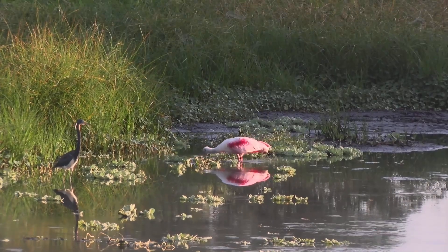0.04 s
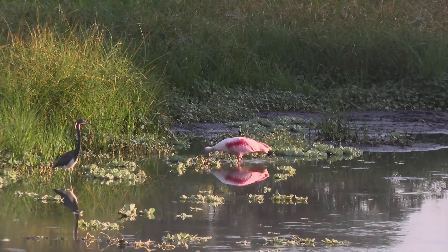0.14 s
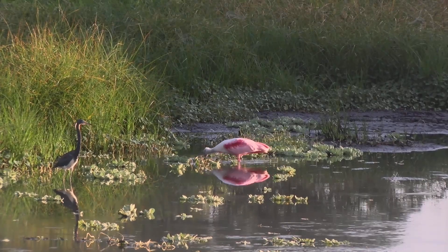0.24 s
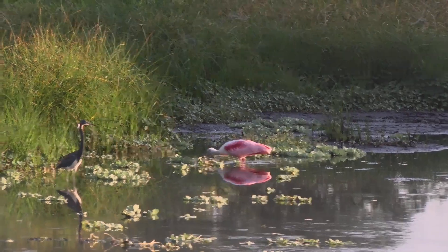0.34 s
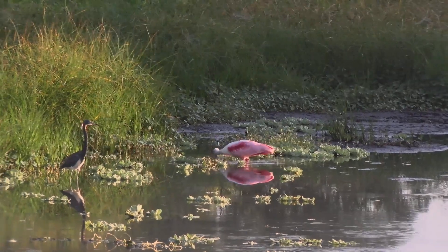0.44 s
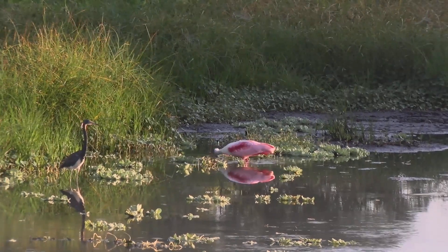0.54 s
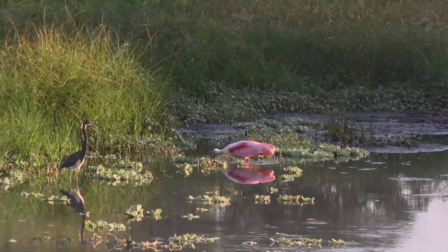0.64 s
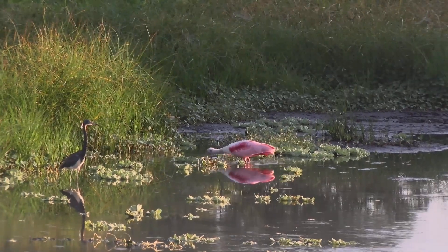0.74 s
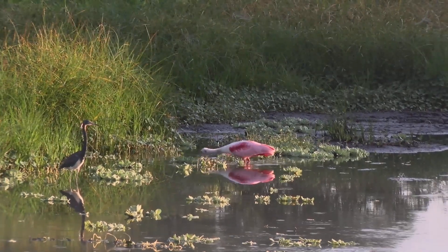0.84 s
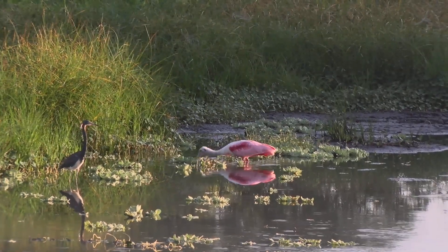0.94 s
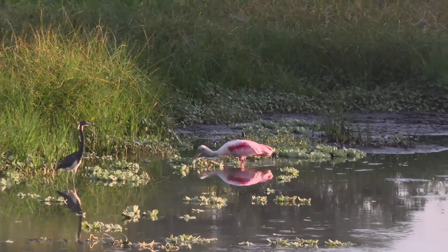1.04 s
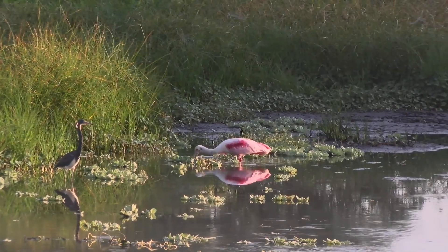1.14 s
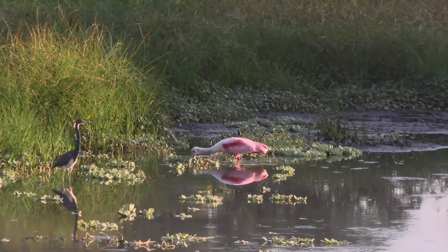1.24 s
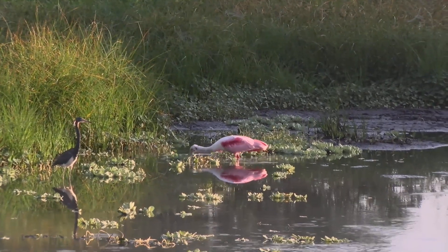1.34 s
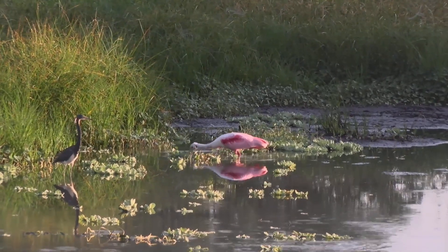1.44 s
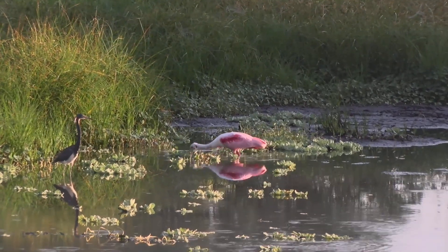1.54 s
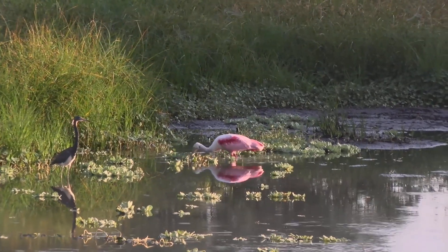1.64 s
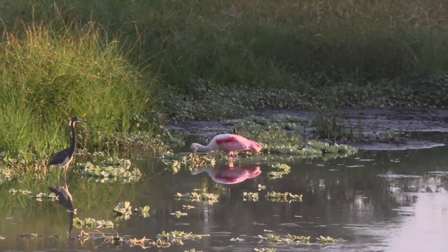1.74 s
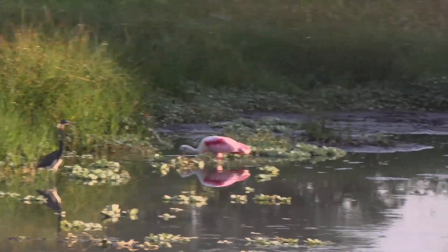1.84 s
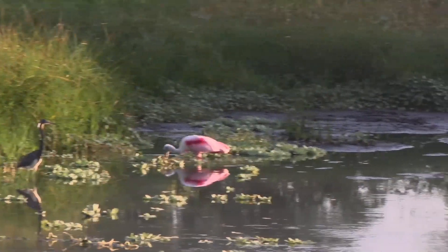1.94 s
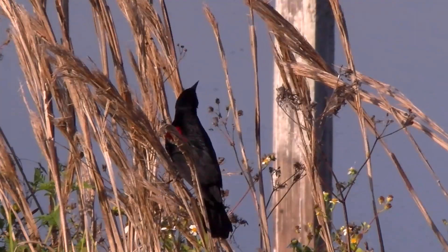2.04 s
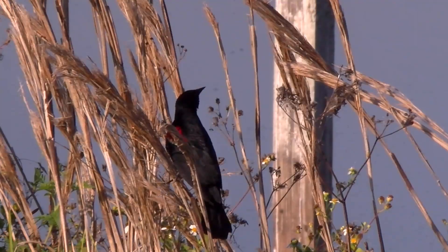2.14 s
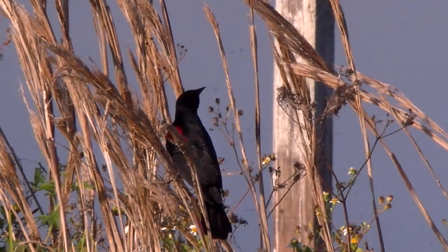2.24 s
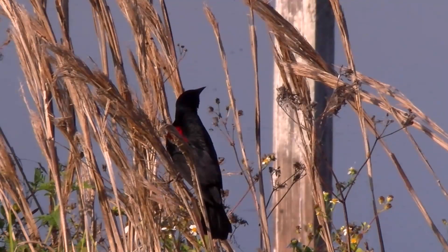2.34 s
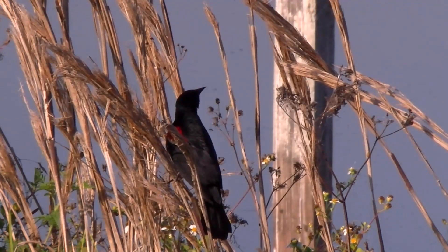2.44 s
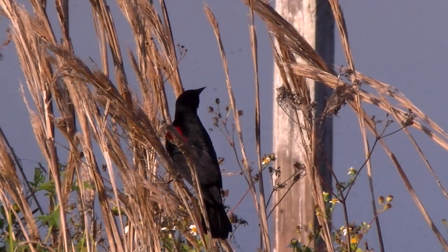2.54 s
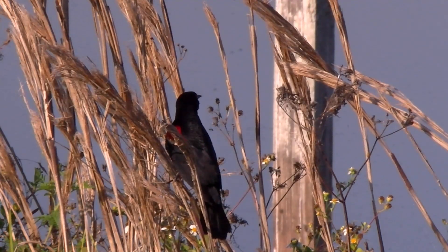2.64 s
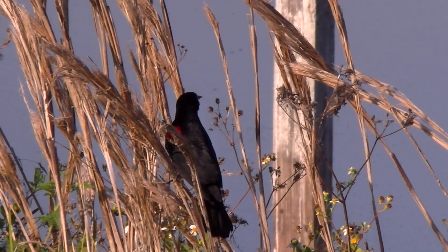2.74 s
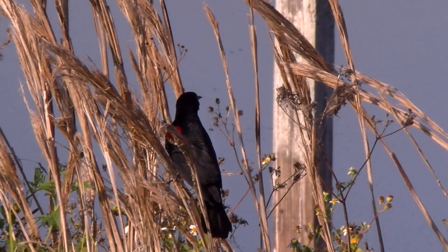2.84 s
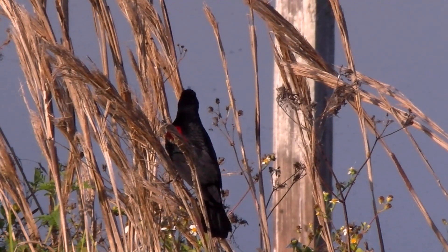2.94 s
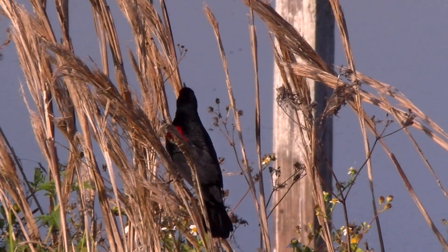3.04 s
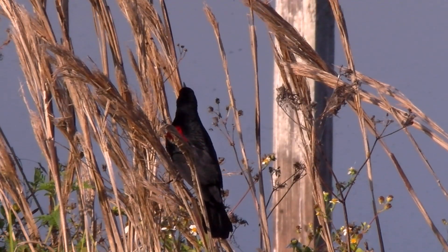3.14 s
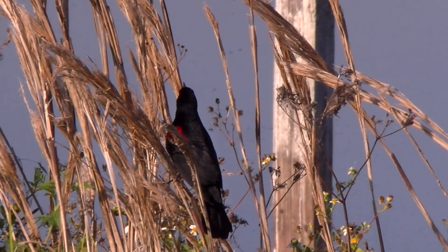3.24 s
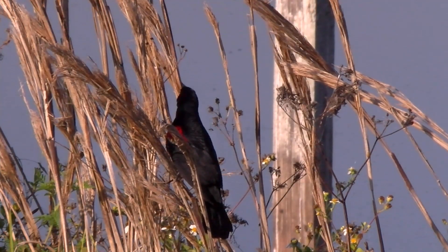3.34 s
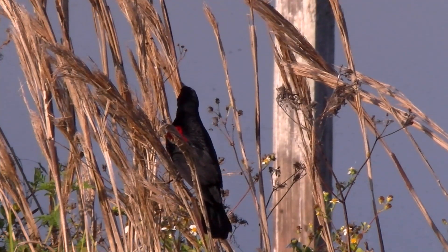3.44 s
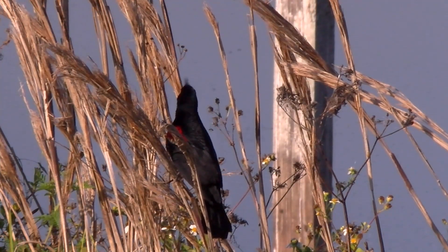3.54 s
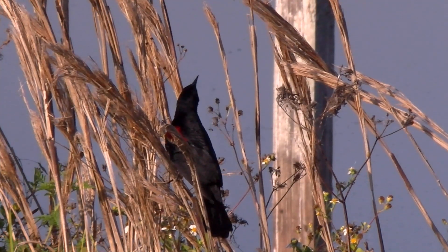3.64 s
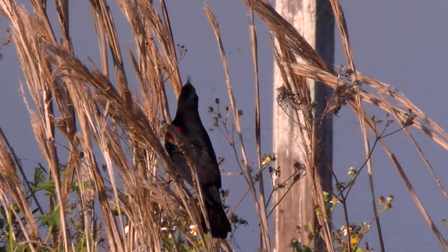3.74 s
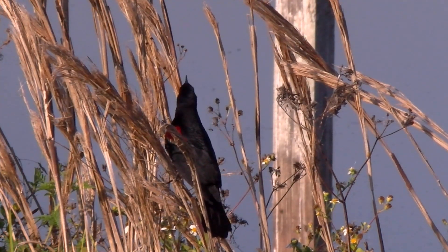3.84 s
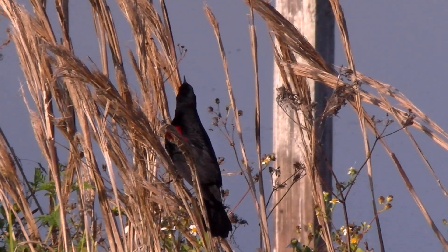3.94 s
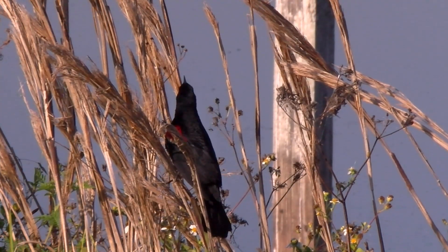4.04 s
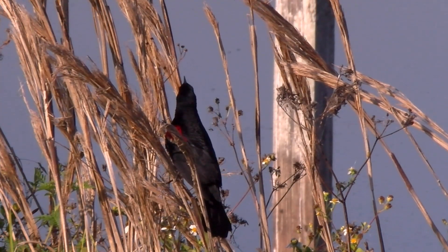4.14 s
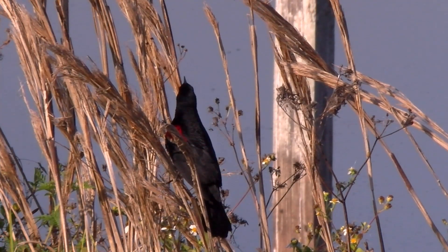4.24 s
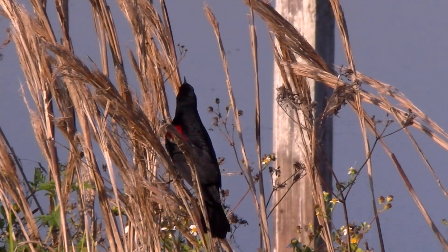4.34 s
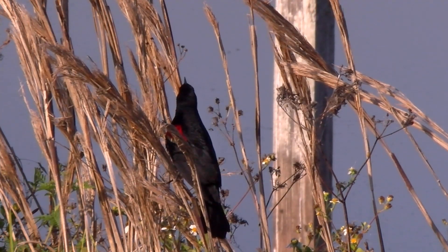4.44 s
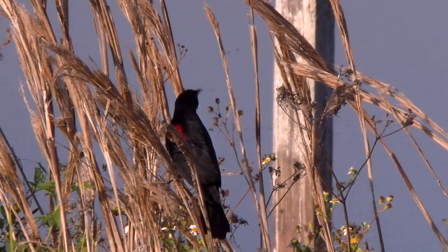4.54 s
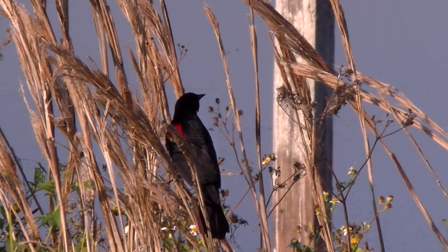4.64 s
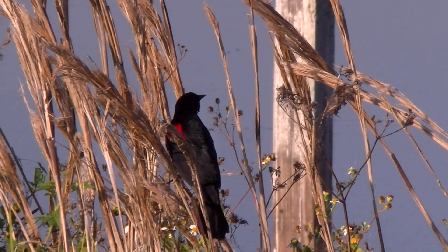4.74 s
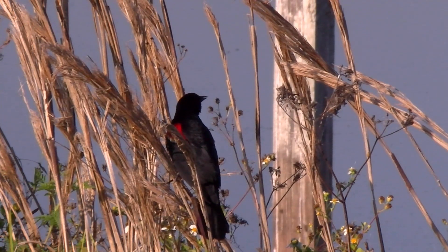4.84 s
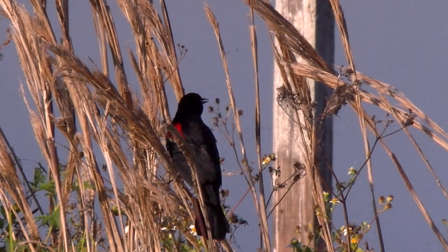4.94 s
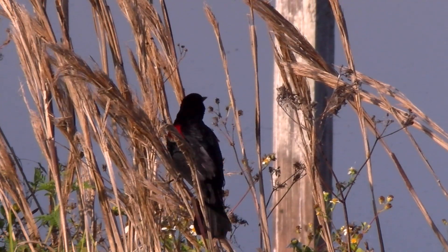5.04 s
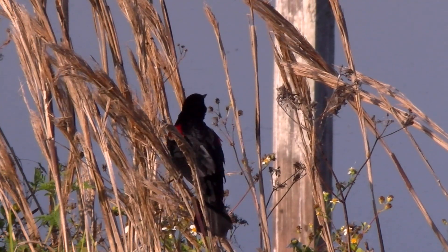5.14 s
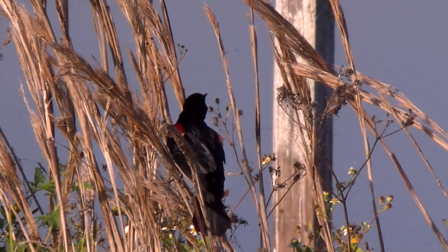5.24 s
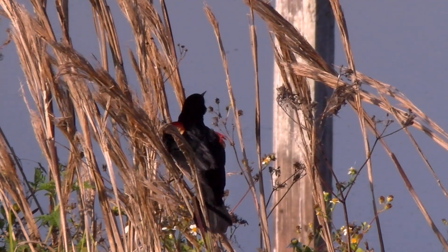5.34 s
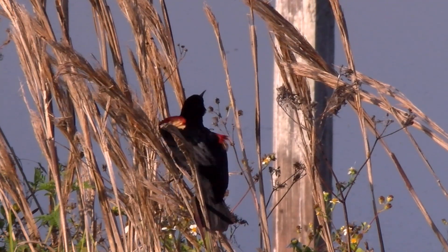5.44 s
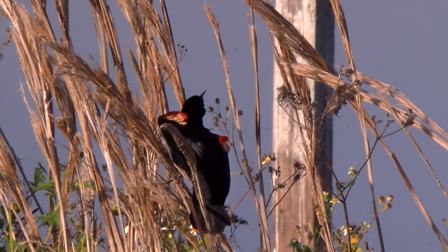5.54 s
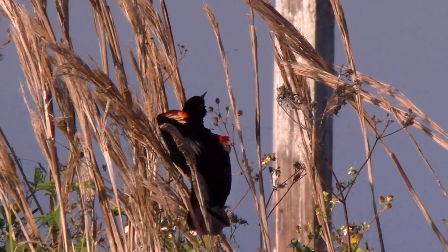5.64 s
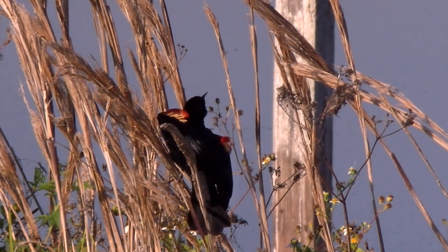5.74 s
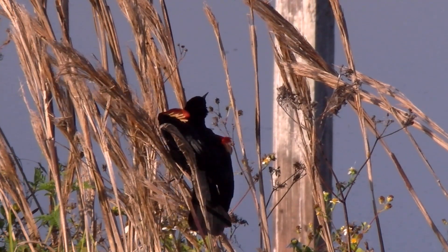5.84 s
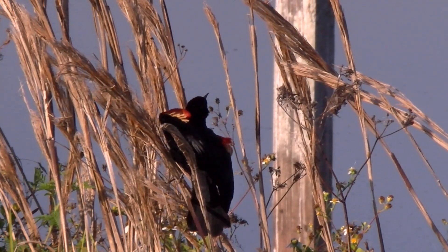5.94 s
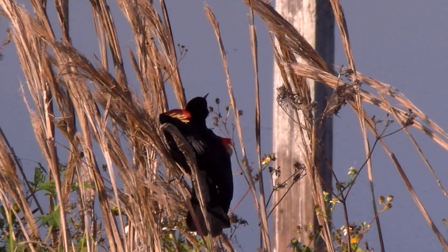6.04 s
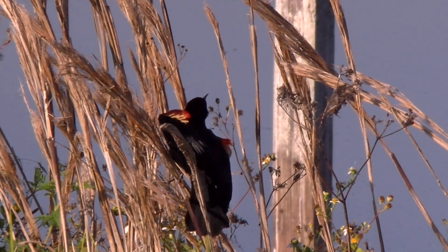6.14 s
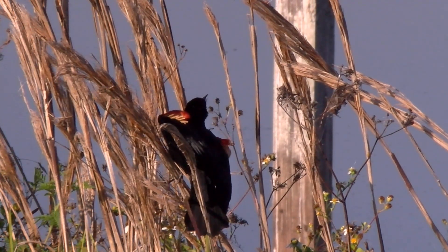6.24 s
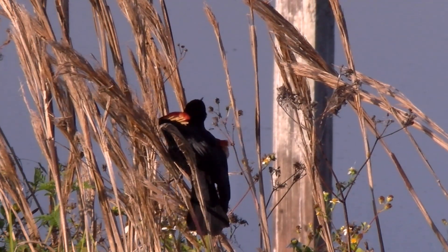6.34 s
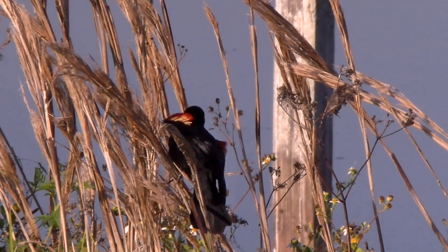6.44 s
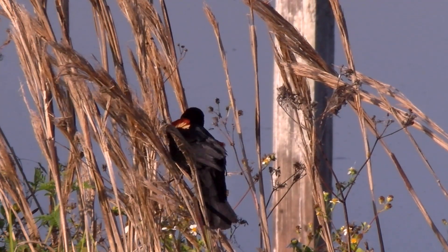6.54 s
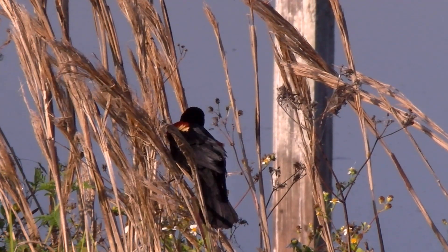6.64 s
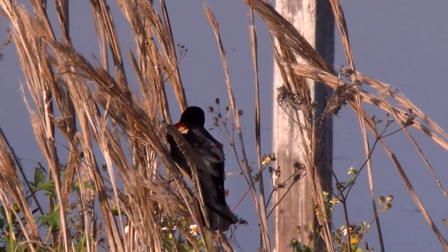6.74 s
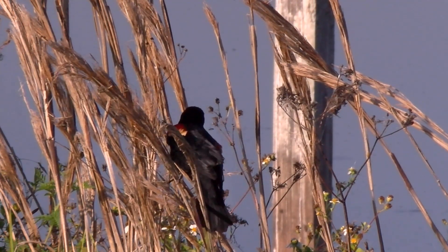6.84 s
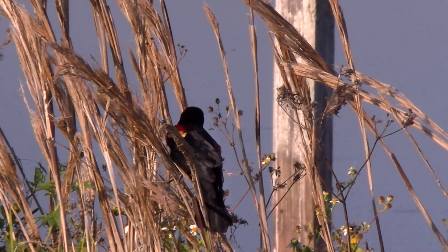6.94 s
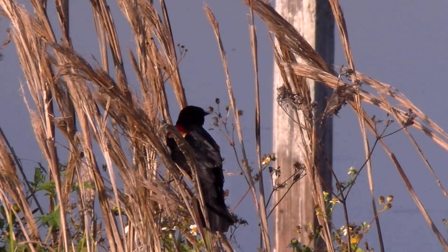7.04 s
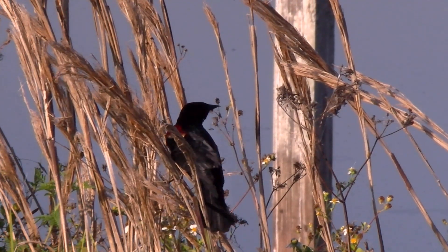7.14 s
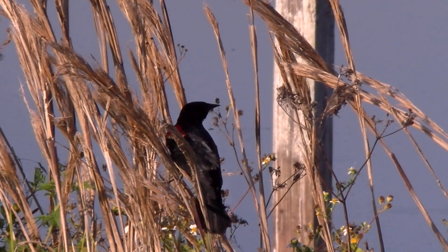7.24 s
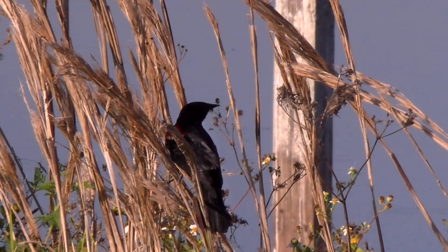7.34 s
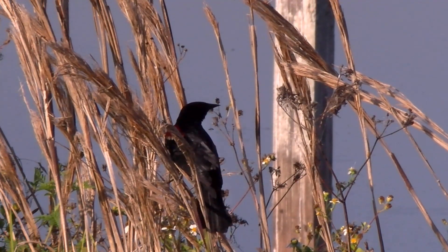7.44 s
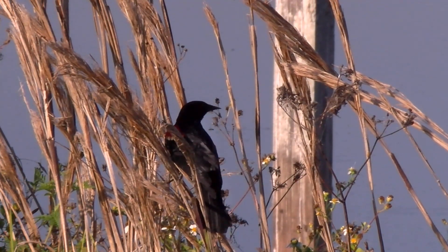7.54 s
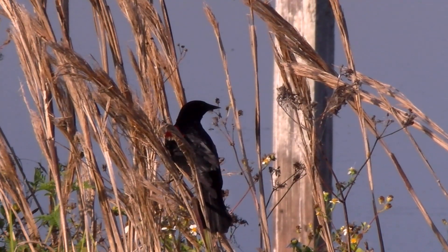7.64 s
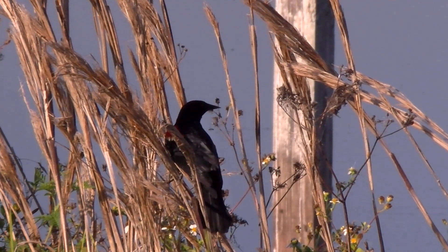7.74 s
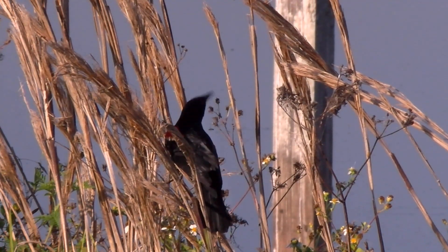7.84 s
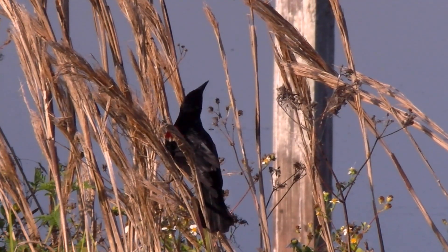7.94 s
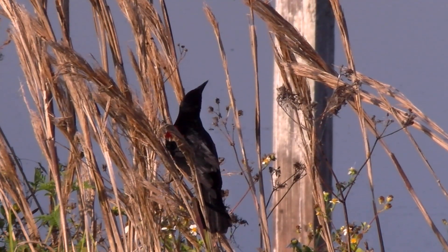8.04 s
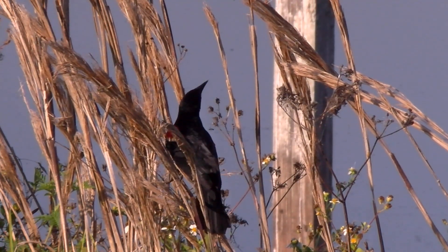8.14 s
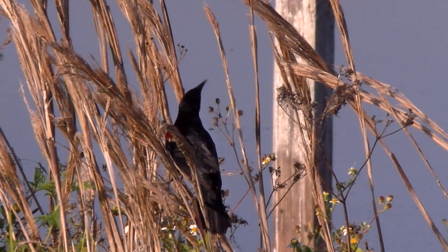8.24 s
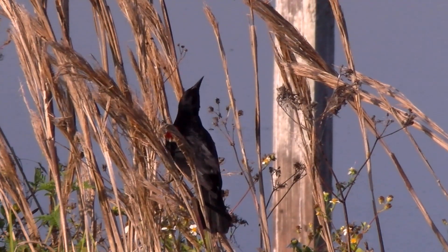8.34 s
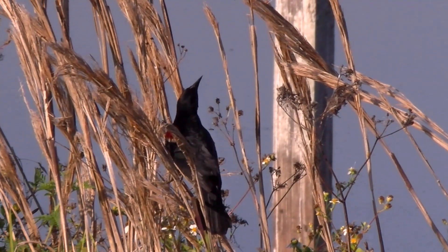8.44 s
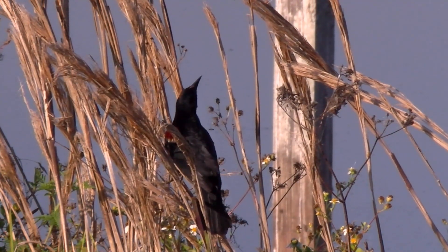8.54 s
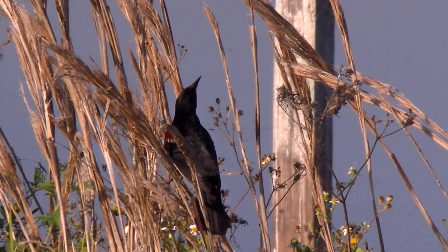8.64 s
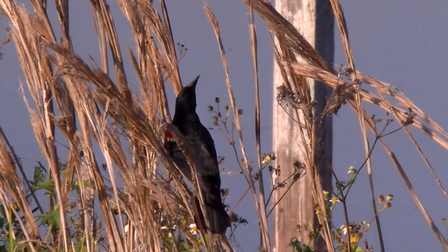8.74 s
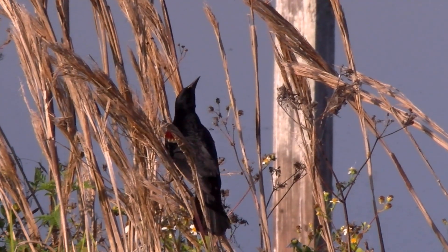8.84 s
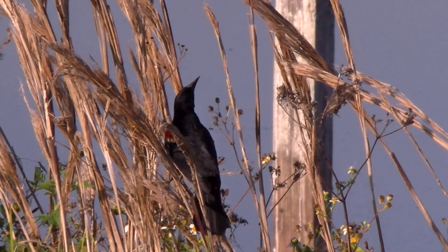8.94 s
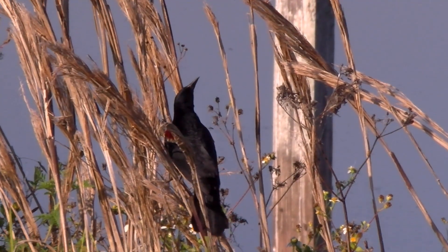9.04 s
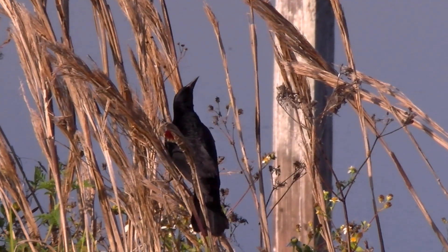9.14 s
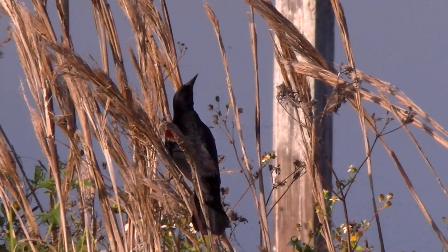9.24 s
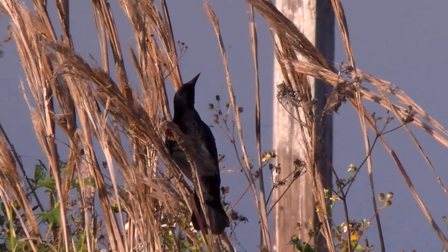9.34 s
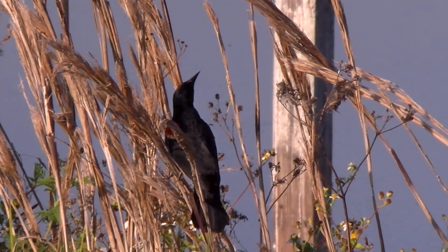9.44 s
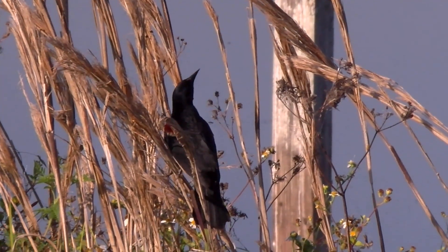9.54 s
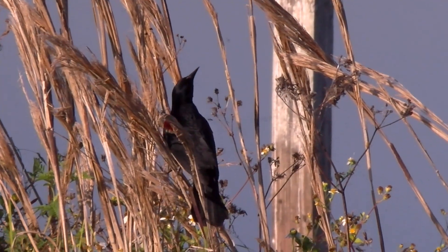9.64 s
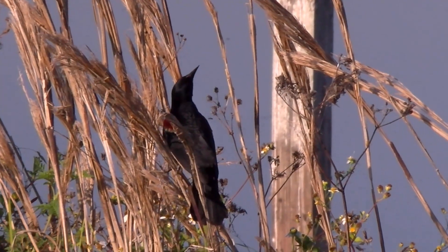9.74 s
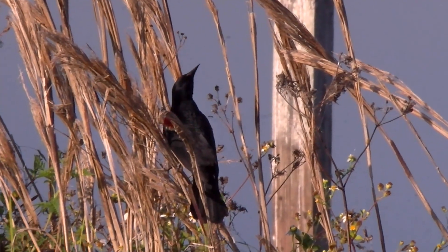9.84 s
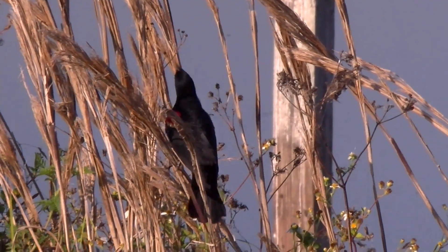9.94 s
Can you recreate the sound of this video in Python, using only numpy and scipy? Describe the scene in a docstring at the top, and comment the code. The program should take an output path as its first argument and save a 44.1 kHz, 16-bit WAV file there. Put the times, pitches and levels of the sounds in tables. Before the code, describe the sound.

Two marsh places, heard through an open-air microphone. First comes a rumbling pond with pulsing crickets, three raspy bird calls and bassy wind bumps. Then the background drops abruptly to a steady low hum and thin insect sizzle, with small distant chirps. Nearby, a red-winged blackbird gives a loud gurgling whistle and metallic trill, pauses, and repeats it more quietly, with light echo from the reeds.

```python
"""Marsh in two places

First a wide pond: low roar, wind bumps on the microphone, a cricket chorus, a rasping bird. Then a reed bed:
a motor hum, a katydid's high buzz, far chirps, and a blackbird close by that sings twice, each time liquid
whistles, a buzzing trill and a warbled ending. Air and wind are shaped noise, insects are noise ringing in
wing resonances, and birds are gliding tones, gated into syllables for trills, with echoes from the marsh."""
import sys
import numpy as np
from scipy import signal
from scipy.fft import rfft, irfft
from scipy.io import wavfile
from scipy.ndimage import uniform_filter1d

SR = 44100
rng = np.random.default_rng(int(sys.argv[2]) if len(sys.argv) > 2 else 0)


def dump(signal):
    """Clip the signal to [-1, 1] and save it as 16-bit WAV at the path in sys.argv[1]."""
    limited = np.clip(np.atleast_2d(signal).T, -1, 1)
    pcm = np.round(limited * 32767).astype(np.int16)
    wavfile.write(sys.argv[1], SR, pcm)


N = 440118
T = np.arange(N) / SR   # seconds
PLACE_CHANGE_S = 1.963   # from the pond to the reed bed

# Steady air at each place. Each row: frequency in Hz, power in dB per Hz.
POND_SPECTRUM = [(30, -120), (80, -67), (170, -75.5), (200, -61), (270, -60), (500, -69), (900, -78),
                 (1100, -82.5), (2000, -99), (5800, -99), (6800, -106), (7700, -101), (9000, -108),
                 (16000, -110)]
REED_SPECTRUM = [(25, -101), (60, -89), (130, -79), (200, -74), (340, -83), (700, -83.5), (1100, -95.5),
                 (1600, -102), (3000, -104), (4500, -107), (7000, -108), (16000, -110)]
# Gusts on the microphone. Each row: loudest moment in seconds, rumble level in dB.
WIND_GUSTS = [(.35, -57), (.48, -45), (.95, -51), (1.5, -47), (1.76, -52), (1.95, -56), (8.95, -50),
              (9.1, -52)]
# Wind bumps on the microphone. Each row: middle in seconds, level in dB, pitch in Hz,
# time from middle to near silence in ms, roughness (0 is smooth).
WIND_BUMPS = [(.31, -39, 64.3, 25, .2), (1.431, -19, 76.6, 23, 0.2), (1.676, -17, 76, 9.8, 0.07),
              (1.72, -30, 65, 18, .2)]
# Wing resonances of the pond's cricket chorus. Each row: centre in Hz, width of one pass in Hz, level in dB.
CHORUS_WINGS = [(4245, 500, -53), (4560, 320, -53), (4910, 660, -53)]
# Wing resonance of a single cricket at the pond. Each row: centre in Hz, width of one pass in Hz, level in dB.
CRICKET_WINGS = [(5182, 88, -49.5)]
# When that cricket chirps. Each row: start in seconds, end in seconds.
CRICKET_CHIRP_TIMES = [(0, 0.17), (.29, 0.43), (.58, 0.68), (.8, 0.94), (1.12, 1.326), (1.48, 1.6),
                       (1.7, 1.88)]
# Wing resonances of the katydid in the reeds. Each row: centre in Hz, width of one pass in Hz, level in dB.
KATYDID_WINGS = [(8786, 580, -55.5), (9106, 340, -51.5), (9580, 210, -61), (9993, 67, -62)]
# Wing resonance of a far cricket. Each row: centre in Hz, width of one pass in Hz, level at full chirp in dB.
FAR_CRICKET_WINGS = [(5590, 590, -69.5)]
# Chirps of far birds, each one glide. Each row: start in seconds, length in ms, from Hz, to Hz, level in dB.
FAR_BIRD_CHIRPS = [ (1.89, 72, 2700, 2180, -51), (2.135, 68, 1640, 1646, -66), (1.885, 50, 3500, 2900, -60),
                   (2.18, 230, 3440, 3010, -70), (2.25, 16, 3100, 2100, -58.5), (2.27, 9, 3000, 4300, -59),
                   (2.34, 10, 3350, 2600, -64), (2.275, 81, 4280, 3170, -61), (2.522, 62, 2790, 2230, -53),
                   (2.612, 78, 4100, 3180, -66), (3.03, 82, 5400, 4800, -70), (3.14, 50, 3160, 2150, -64),
                   (3.2, 93, 2125, 2170, -74), (3.272, 100, 4740, 4430, -66), (3.9, 56, 2900, 2100, -69),
                   (4.22, 68, 3520, 3460, -72), (4.31, 80, 3430, 3130, -72), (4.885, 120, 4840, 4770, -69),
                   (6.7, 16, 3610, 1880, -61), (6.738, 91, 2080, 2165, -56), (7.03, 34, 3400, 3890, -65.5),
                   (7.085, 29, 4400, 3280, -61.5), (7.175, 63, 4450, 4150, -64.5),
                   (7.215, 55, 4100, 2900, -66), (7.82, 30, 4250, 4350, -71),
                   (7.975, 30, 4250, 4050, -68.5), (7.95, 45, 3200, 3480, -70),
                   (7.893, 44, 4150, 4280, -70.5), (7.995, 225, 3450, 3030, -69.5),
                   (8.062, 27, 4450, 4130, -67), (8.206, 63, 4020, 4230, -68),
                   (8.315, 58, 4330, 3850, -66.5), (9.44, 30, 4620, 3880, -65.5),
                   (9.528, 51, 4060, 3720, -61.5), (9.58, 47, 3880, 3760, -53.5),
                   (9.69, 60, 4480, 4150, -63)]
# Short ticks and chucks, the blackbird's own among them. Each row: middle in seconds, level in dB, pitch in Hz,
# time from middle to near silence in ms, roughness (0 is smooth).
SHORT_TICKS = [(.662, -41, 2310, 5, 0.4), (.686, -45, 2300, 5, 0.3), (.762, -40.5, 2100, 4, 0.68),
               (.851, -21.5, 2570, 13, 0.84), (.962, -41, 2100, 4, 0.9), (1.417, -33, 1110, 6, 0.46),
               (2.115, -47, 4500, 1.2, 0.6), (2.495, -46.5, 2440, 9, 0.5), (2.5185, -20.5, 2330, 1.1, 0.23),
               (2.775, -56, 2500, 11, 0.76), (2.81, -52, 2200, 4, 1.1), (3.875, -53, 2700, 3, .3),
               (5.505, -28.5, 3450, 15, 1.1), (6.258, -40.5, 1930, 8.5, 0.75), (5.213, -37, 1300, 3, 0.6),
               (5.2955, -31, 1420, 2.5, 0.4), (5.3275, -17, 2080, 1.5, 0.42), (5.5125, -21, 5740, 2.5, .2),
               (5.516, -7, 3980, 1.6, 0.2), (7.098, -51.5, 1300, 5, 0.25), (8.123, -39, 1910, 8, 0.94),
               (8.113, -36, 1364, 4, 0.54), (8.441, -40, 5700, 3, 0.2), (8.44, -34, 4300, 2.5, 0.54),
               (9.765, -46, 3260, 3, 0.5), (9.79, -51, 3300, 5, 0.43)]
# The rasping bird's three calls. Each row: loudest moment in seconds, level in dB.
RASP_CALLS = [(.06, -44), (0.44, -46.5), (0.848, -39.5)]

# Trills repeat one syllable, and share three kinds of table.
# Pace. Each row: time in seconds, syllables begun.
# Effort. Each row: time in seconds, level in dB.
# Voices. Each row: start and length as shares of a syllable, from Hz, to Hz, dB against the other voices,
# roughness (0 to 1).
# The rasping bird: syllable pace, voices.
RASP_SYLLABLES = [(0, 0), (.95, 82)]
RASP_TONES = [(0, .95, 3480, 3320, 0, .45), (.3, .9, 3200, 3000, -6, .7), (.2, .9, 2600, 2350, -15, .8)]
# A bird's short rattle: pace, effort, voices.
RATTLE_SYLLABLES = [(7.39, 0), (7.535, 11)]
RATTLE_LEVEL = [(7.39, -66), (7.41, -66), (7.5, -66), (7.535, -72)]
RATTLE_TONES = [(0, .7, 4600, 3400, 0, .5), (.3, .7, 4000, 3100, -3, .8)]
# Blackbird, first phrase, quick buzz: pace, effort, voices.
BUZZ_SYLLABLES = [(5.3785, 0), (5.4335, 10), (5.4635, 16), (5.479, 19.5)]
BUZZ_LEVEL = [(5.372, -48), (5.392, -25), (5.414, -20.5), (5.432, -19.5), (5.455, -21), (5.479, -30)]
BUZZ_TONES = [(0, .75, 3300, 4450, 0, .08), (.5, .55, 4400, 4300, -7, .15), (0, 1, 5640, 5600, -18, .1),
              (0, 1, 6380, 6440, -26, .15), (.1, .8, 7000, 7700, -36, .2), (0, .9, 13000, 13200, -44, .5)]
# Blackbird, first phrase, long trill: pace, effort, voices.
LONG_TRILL_SYLLABLES = [(5.5518, 0), (5.7012, 9), (5.8582, 18), (6.0003, 26), (6.1437, 34), (6.2683, 41)]
LONG_TRILL_LEVEL = [(5.546, -23.5), (5.556, -17), (5.601, -20.5), (5.9, -20.5), (6.24, -22), (6.259, -26),
                    (6.271, -41.5)]
LONG_TRILL_TONES = [(-.08, .62, 3115, 3075, 1, .2), (-.08, .58, 3620, 3740, -1.5, .3),
                    (-.07, .2, 3300, 3550, -4, .15), (.27, .27, 3900, 4150, -6, .3),
                    (.45, .55, 4000, 3650, -10, .6), (.45, .55, 2950, 3250, -12.5, .6),
                    (0, .98, 2800, 2300, -23, .8), (.8, .99, 5560, 5760, -15, .6),
                    (.4, .5, 5700, 5500, -20, .7), (.8, .6, 5280, 5400, -19, .5),
                    (.9, .7, 5950, 6400, -26, .6), (0, .9, 4400, 4900, -34, .9)]
# Blackbird, first phrase, warbled ending: pace, effort, voices.
WARBLE_SYLLABLES = [(6.27, 0), (6.286, 1.0), (6.316, 3), (6.343, 5), (6.405, 10)]
WARBLE_LEVEL = [(6.264, -38), (6.279, -24), (6.295, -19.5), (6.322, -20), (6.343, -30), (6.37, -40),
                (6.405, -58)]
WARBLE_TONES = [(0, 1, 2480, 2030, 0, .1), (.75, .5, 2150, 2500, -8, .3)]
# Blackbird, second phrase, short trill: pace, effort, voices.
SHORT_TRILL_SYLLABLES = [(8.447, 0), (8.4654, 2.0), (8.4812, 4), (8.607, 20.0), (8.7823, 42)]
SHORT_TRILL_LEVEL = [(8.444, -52), (8.454, -42), (8.458, -28), (8.6, -27.5), (8.776, -27.5), (8.784, -42)]
SHORT_TRILL_TONES = [(0, .66, 3770, 3630, 0, .2), (0, .72, 3430, 3110, -2, .35),
                     (.35, .72, 3150, 2820, -5, .4), (.5, .6, 3500, 3740, -7, .4),
                     (.5, .99, 5500, 5720, -9, .4), (0, .99, 4250, 5000, -28, .9),
                     (0, .99, 2650, 2300, -27, .9)]
# Blackbird, second phrase, ending: pace, effort, voices.
ENDING_SYLLABLES = [(8.803, 0), (8.8425, 4), (8.865, 6), (8.894, 8), (8.927, 10), (9.02, 15)]
ENDING_LEVEL = [(8.798, -49), (8.825, -23.5), (8.86, -25), (8.884, -34), (8.9, -42), (8.94, -53),
                (9.02, -74)]
ENDING_TONES = [(0, 0.98, 4600, 4260, 0, .05)]
# The other side of the syrinx under that ending, at the same pace: effort, voices.
UNDER_LEVEL = [(8.803, -30), (8.83, -40), (8.86, -43), (8.885, -40), (8.915, -55)]
UNDER_TONES = [(0, 0.67, 3000, 2360, -6, 0.6), (0.33, 0.95, 2300, 2560, -3, 0.73),
               (0, 0.51, 4100, 3600, -9, 0.87)]
# The blackbird's whistled notes. Each row: start in seconds, attack in ms, hold in ms, release in ms,
# from Hz, to Hz, level in dB.
SONG_WHISTLES = [ (5.05, 24, 28, 68, 1258, 1306, -33), (5.285, 12, 28, 12, 1530, 1690, -38),
                 (5.306, 18, 8, 8, 2580, 2500, -41), (5.336, 3, 6, 26, 1990, 2200, -22),
                 (5.345, 14, 68, 55, 2183, 2181, -34), (5.355, 55, 18, 18, 4372, 4376, -33),
                 (5.443, 17, 12, 12, 4230, 4130, -27.5), (5.475, 14, 1, 14, 2260, 2250, -28),
                 (5.472, 17, 3, 14, 2605, 2665, -23), (5.518, 6, 20, 16, 3285, 3232, -9.5),
                 (6.33, 12, 28, 40, 2390, 2500, -33), (6.33, 10, 8, 60, 2130, 2230, -36),
                 (7.92, 47, 16, 90, 1595, 1560, -43), (7.915, 52, 10, 110, 812, 775, -56),
                 (8.131, 7, 1, 13, 1890, 1865, -40), (8.131, 8, 1, 17, 2250, 2480, -39),
                 (8.178, 54, 14, 92, 1622, 1640, -22.5), (8.337, 11, 10, 22, 1255, 1280, -40),
                 (8.358, 18, 2, 8, 2490, 2580, -30), (8.374, 9, 5, 9, 2315, 2170, -21),
                 (8.388, 11, 6, 34, 2615, 2655, -29), (8.392, 12, 3, 20, 2195, 2235, -35),
                 (8.78, 15, 2, 11, 2640, 2575, -22), (8.783, 7, 2, 15, 2200, 2180, -39),
                 (8.865, 40, 46, 55, 2275, 2195, -33.5)]
# Overtones of some whistles, keyed by row number. Each row: multiple of the pitch, dB against the whistle.
WHISTLE_OVERTONES = {0: [(2, -32), (3, -33)], 4: [(3, -26)], 5: [(3, -38)], 9: [(.5, -34), (1.5, -38),
                     (2, -37), (4, -55)], 16: [(2, -52), (3, -53)], 20: [(.5, -25), (1.5, -40)]}

HUM_HZ, REED_HUM_DB, POND_HUM_DB = 96.9, -48, -51
GUST_RISE_DB_PER_S, GUST_FALL_DB_PER_S, POND_LULL_DB = 173.5, 148, -78
FAR_CRICKET_PER_S, FAR_CRICKET_BEAT_S = 4.77, 2.195   # chirp rate, one chirp's middle
RASP_SWELL_DB_PER_S2 = 2200   # how sharply each call swells and fades
CHIRP_ATTACK_SHARE, CHIRP_HOLD_SHARE, CHIRP_RELEASE_SHARE = .18, .55, .27   # of a chirp's length
NOTE_EDGE_DB = 36.5   # how far a note's swell and fade reach under its level
SONG_WAVER_DB, CHIRP_WAVER_DB = .5, 3.5   # unsteadiness of level; far air makes chirps flicker
PACE_WAVER = .019   # trills hurry and drag by this share of a syllable
ECHO_DB, ECHO_T60_S, ECHO_LATE_DB, ECHO_LATE_T60_S = -15, .12, -37, .7
BANK_DB, BANK_DELAY_S, BANK_SPREAD_S, BANK_CUT_HZ = -52, .43, .015, 3300
CUTOFF_HZ = 16500   # the top is 80 dB down from here


def amp(db):
    """Decibels to gain."""
    return 10 ** (np.asarray(db) / 20)


def rms_one(x):
    """Scales to rms 1."""
    return x / np.sqrt(np.mean(x ** 2) + 1e-20)


def wander(hz, size=N):
    """Smooth noise that changes about hz times a second; rms 1."""
    pole = np.exp(-2 * np.pi * hz / SR)
    noise = rng.standard_normal(size + SR // 4)
    slow = signal.lfilter([1], [1, -2 * pole, pole * pole], noise)
    return rms_one(slow[SR // 4:])   # the filter has settled by here


def flutter(hz, size):
    """Noise with little above hz; rms 1."""
    low = signal.butter(6, hz, fs=SR, output="sos")
    return rms_one(signal.sosfilt(low, rng.standard_normal(size + 4000))[4000:])


def coloured(spectrum):
    """Steady noise with the given power per hertz."""
    hz, db = np.transpose(spectrum)
    bins = np.maximum(np.arange(N // 2 + 1) * SR / N, 1)
    gain = amp(np.interp(np.log(bins), np.log(hz), db)) * np.sqrt(SR / 2)
    return irfft(rfft(rng.standard_normal(N)) * gain, N)


def bursts(rows):
    """Bell-shaped tone bursts; rough ones are chopped by fast noise."""
    out = np.zeros(N)
    u = np.arange(-4000, 4000) / SR
    for s, db, hz, ms, rough in rows:
        shake = (1 - rough) + rough * flutter(hz / 4, size=len(u))
        bell = np.exp(-(u * 1000 / ms) ** 2 * 2)
        first = int(s * SR) - 4000
        out[first:first + len(u)] += amp(db) * bell * shake * np.cos(2 * np.pi * hz * u)
    return out


def insect(modes, strokes_hz, depth):
    """Scraping noise passes twice through each wing resonance, throbbing at the stroke rate."""
    out = 0
    for hz, width_hz, db in modes:
        r = np.exp(-np.pi * width_hz / SR)
        wing = [1, 0, -1], [1, -2 * r * np.cos(2 * np.pi * hz / SR), r * r]
        once = signal.lfilter(*wing, rng.standard_normal(N))
        out = out + amp(db) * rms_one(signal.lfilter(*wing, once))
    turn = 2 * np.pi * strokes_hz * T + .8 * wander(2.5)   # strokes are a little uneven
    return out * rms_one(1 + depth * np.sin(turn) + .4 * depth * np.sin(2 * turn))


def wind():
    """Gusts rumble low on the microphone; by the pond the air is never quite still."""
    band = signal.butter(3, [42, 85], "band", fs=SR, output="sos")
    rumble = rms_one(signal.sosfilt(band, rng.standard_normal(N)))
    level = amp(POND_LULL_DB) * (T < PLACE_CHANGE_S)
    for s, db in WIND_GUSTS:
        slope = np.where(T < s, GUST_RISE_DB_PER_S, GUST_FALL_DB_PER_S)
        level = level + amp(db - slope * abs(T - s))
    return level * rumble + bursts(WIND_BUMPS)


def pond():
    """The wide pond: wavering noise for the roar, a steady hum, a cricket chorus and one cricket chirping."""
    chirping = sum((T > start) & (T < end) for start, end in CRICKET_CHIRP_TIMES)
    softened = uniform_filter1d(chirping * 1., size=1500)
    cricket = softened * insect(CRICKET_WINGS, 63.3, depth=.44)
    roar = coloured(POND_SPECTRUM) * amp(1.3 * wander(19))
    hum = amp(POND_HUM_DB) * np.sqrt(2) * np.sin(2 * np.pi * HUM_HZ * T)
    return roar + hum + cricket + insect(CHORUS_WINGS, 64, depth=.098)


def reed_bed():
    """The reed bed: steady noise, a motor hum unsteady in level and phase, a katydid and a far cricket."""
    hum_level = amp(REED_HUM_DB + .6 * wander(3.2)) * np.sqrt(2)
    hum = hum_level * np.sin(2 * np.pi * HUM_HZ * T + .3 * wander(1.5))
    beat = np.cos(2 * np.pi * FAR_CRICKET_PER_S * (T - FAR_CRICKET_BEAT_S))
    chirping = np.clip(.6 + 1.5 * beat, .45, 1)   # between chirps it never falls silent
    far_cricket = chirping * insect(FAR_CRICKET_WINGS, 73, depth=.6)
    return coloured(REED_SPECTRUM) + hum + insect(KATYDID_WINGS, 61.3, depth=.27) + far_cricket


def whistles(notes, overtones, waver_db):
    """Near-sines that glide evenly in pitch while they swell, hold and fade."""
    out = np.zeros(N)
    for number, (s, attack_ms, hold_ms, release_ms, from_hz, to_hz, db) in enumerate(notes):
        total_ms = attack_ms + hold_ms + release_ms
        ms = np.arange(int(total_ms * SR / 1000)) * 1000 / SR
        turn = 2 * np.pi * np.cumsum(np.linspace(from_hz, to_hz, len(ms))) / SR
        tone = np.sin(turn)
        for multiple, overtone_db in overtones.get(number, []):
            tone = tone + amp(overtone_db) * np.sin(multiple * turn)
        opening = np.clip(np.minimum(ms / attack_ms, (total_ms - ms) / release_ms), 0, 1)
        level_db = waver_db * wander(50, size=len(ms)) - NOTE_EDGE_DB * (1 - opening) ** 2
        level = amp(level_db) * np.minimum(10 * opening, 1)   # starts and ends at zero
        first = int(s * SR)
        out[first:first + len(ms)] += np.sqrt(2) * amp(db) * level * tone
    return out


def trill(pace, effort, voices, edge, lean, climb=0):
    """Each syllable gates a few gliding tones, each entering at its own share of the syllable with its phase
    restarted; roughness shakes them and varies every repeat. A high edge opens and shuts abruptly;
    lean under 1 peaks early, over 1 late; voices starting above 4.5 kHz climb (or sink, if negative)
    by a share of their pitch across the trill."""
    s, db = np.transpose(effort)
    span = slice(int(s[0] * SR), int(s[-1] * SR))
    beat = np.interp(T[span], *np.transpose(pace))
    beat = np.maximum.accumulate(beat + PACE_WAVER * wander(12, size=len(beat)))   # never runs backwards
    sound = 0
    for start, length, from_hz, to_hz, voice_db, rough in voices:
        which, share = np.divmod(beat - start, 1)   # syllable number, place within it
        along = np.clip(share / length, 0, 1)
        chance = rng.standard_normal((100, 2))[which.astype(int) % 100]   # one pitch and level draw a syllable
        hz = (from_hz + (to_hz - from_hz) * along) * (1 + .01 * rough * chance[:, 0])
        hz = hz * (1 + climb * (from_hz > 4500) * np.linspace(-.5, .5, len(hz)))
        turn = 2 * np.pi * np.cumsum(hz) / SR
        turn = turn - turn[np.searchsorted(which, which)]   # phase restarts with each repeat
        gate = np.sin(np.pi / 2 * np.clip(edge * np.sin(np.pi * along ** lean), 0, 1)) ** 2
        shake = (1 - rough) + rough * flutter(180, size=len(beat))
        voice_level = amp(voice_db + 2.5 * rough * chance[:, 1])
        sound = sound + gate * voice_level * shake * np.sin(turn)
    reach = np.array(voices)[:, 2:4]
    throat = signal.butter(4, [.92 * reach.min(), 1.05 * reach.max()], "band", fs=SR, output="sos")
    sound = signal.sosfilt(throat, sound)   # the throat passes little outside the sung range
    level = amp(np.interp(T[span], s, db)) * signal.windows.tukey(len(beat), .04)
    out = np.zeros(N)
    out[span] = rms_one(sound) * level
    return out


def far_chirps():
    """Far birds chirp in short single glides that flicker in level."""
    shares = np.array([CHIRP_ATTACK_SHARE, CHIRP_HOLD_SHARE, CHIRP_RELEASE_SHARE])
    notes = [(s, *(ms * shares), *pitch_and_level) for s, ms, *pitch_and_level in FAR_BIRD_CHIRPS]
    return whistles(notes, {}, CHIRP_WAVER_DB)


def rasping_bird():
    """Fast rough syllables run on while the level swells and fades for three calls."""
    s = np.arange(0, RASP_SYLLABLES[-1][0], .01)
    calls_db = [db - RASP_SWELL_DB_PER_S2 * (s - loudest) ** 2 for loudest, db in RASP_CALLS]
    effort = np.transpose([s, np.max(calls_db, axis=0)])
    return trill(RASP_SYLLABLES, effort, RASP_TONES, edge=3.4, lean=.93)


def far_birds_and_ticks():
    """Far chirps, a rasping call, a rattle of falling tones, and scattered ticks, the blackbird's own among them."""
    rattle = trill(RATTLE_SYLLABLES, RATTLE_LEVEL, RATTLE_TONES, edge=1.75, lean=.81)
    return far_chirps() + rasping_bird() + rattle + bursts(SHORT_TICKS)


def blackbird():
    """Close by: gliding whistles and gated trills for both phrases, the last ending in two voices."""
    song = whistles(SONG_WHISTLES, WHISTLE_OVERTONES, SONG_WAVER_DB)
    song += trill(BUZZ_SYLLABLES, BUZZ_LEVEL, BUZZ_TONES, edge=.9, lean=.85)
    song += trill(LONG_TRILL_SYLLABLES, LONG_TRILL_LEVEL, LONG_TRILL_TONES, edge=2.1, lean=.9, climb=-.03)
    song += trill(WARBLE_SYLLABLES, WARBLE_LEVEL, WARBLE_TONES, edge=1.4, lean=1.4)
    song += trill(SHORT_TRILL_SYLLABLES, SHORT_TRILL_LEVEL, SHORT_TRILL_TONES, edge=1.3, lean=.8, climb=.04)
    song += trill(ENDING_SYLLABLES, ENDING_LEVEL, ENDING_TONES, edge=.95, lean=.95, climb=-.05)
    song += trill(ENDING_SYLLABLES, UNDER_LEVEL, UNDER_TONES, edge=1.3, lean=.9)
    return song


def marsh_echo(x):
    """Reeds scatter a quick haze of echoes and a faint longer one; the far bank answers once, blurred and dull."""
    t = T[:SR // 2]
    near = amp(-60 * t / ECHO_T60_S) * (t > .004) * rng.standard_normal(len(t))
    late = amp(-60 * t / ECHO_LATE_T60_S) * (t > .04) * rng.standard_normal(len(t))
    bank = np.exp(-((t - BANK_DELAY_S) / BANK_SPREAD_S) ** 2) * flutter(BANK_CUT_HZ, size=len(t))
    haze = np.zeros(len(t))
    for db, part in [(ECHO_DB, near), (ECHO_LATE_DB, late), (BANK_DB, bank)]:
        haze += amp(db) * part / np.linalg.norm(part)   # equal energy before its level
    return x + signal.fftconvolve(x, haze)[:N]


def scene():
    """Birds with their echoes over the background of each place, with wind on the microphone."""
    at_reeds = np.clip((T - PLACE_CHANGE_S) / .004, 0, 1)   # a 4 ms crossfade
    background = (1 - at_reeds) * pond() + at_reeds * reed_bed() + wind()
    birds = marsh_echo(blackbird() + far_birds_and_ticks())
    return (background + birds)[None]


def record(dry):
    """The microphone drops the deepest bass; the top is cut steeply."""
    dry = signal.sosfilt(signal.butter(2, 40, "high", fs=SR, output="sos"), dry)
    return signal.sosfilt(signal.cheby2(14, 80, CUTOFF_HZ, fs=SR, output="sos"), dry)


dry = scene()
out = record(dry)
dump(out)
```